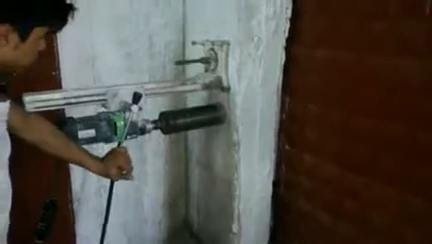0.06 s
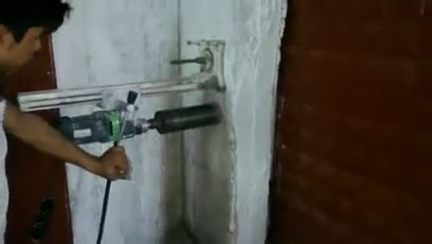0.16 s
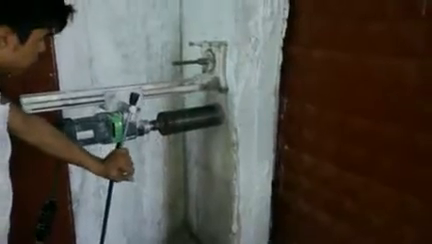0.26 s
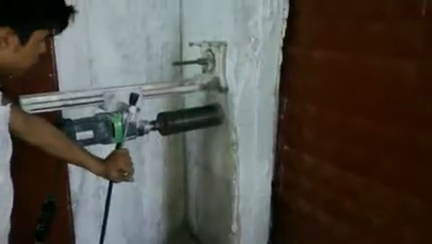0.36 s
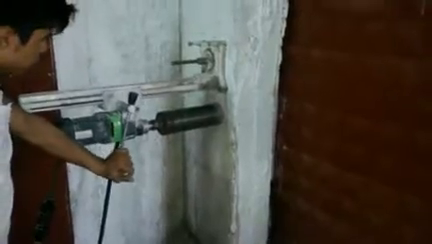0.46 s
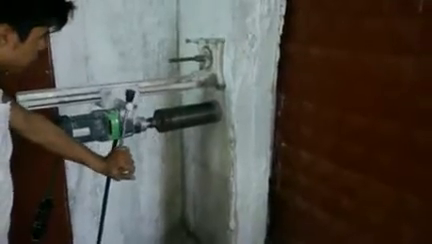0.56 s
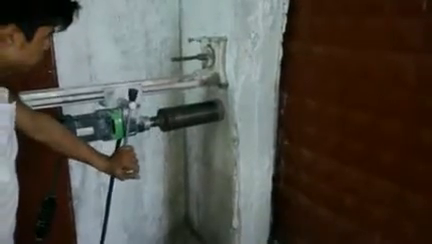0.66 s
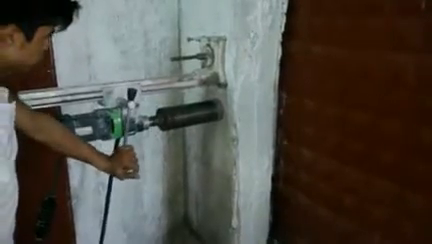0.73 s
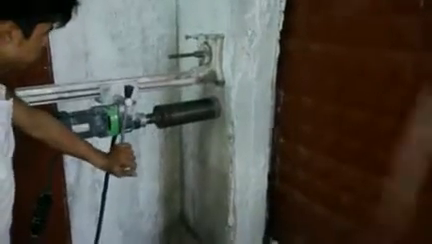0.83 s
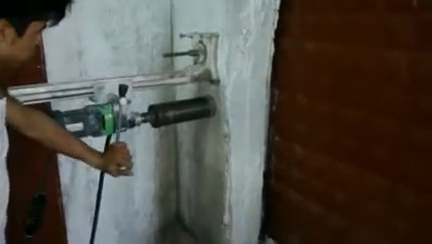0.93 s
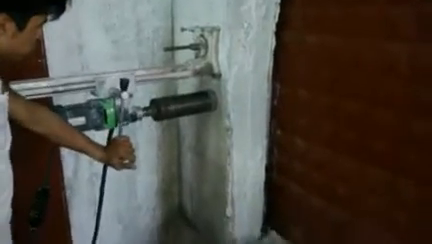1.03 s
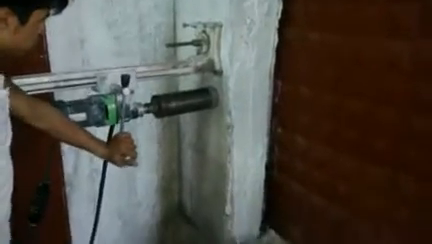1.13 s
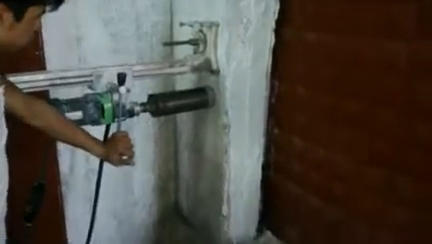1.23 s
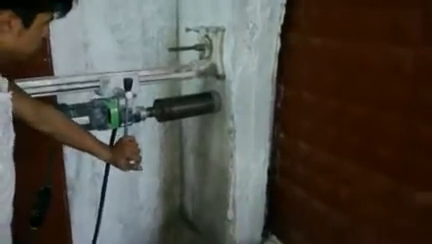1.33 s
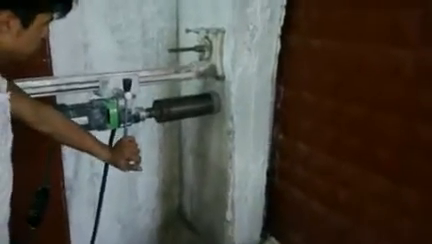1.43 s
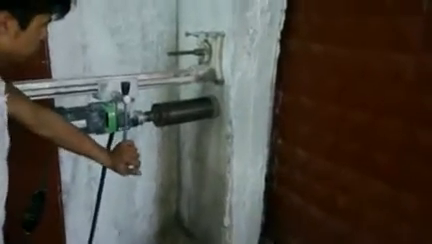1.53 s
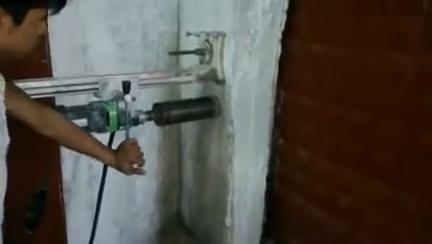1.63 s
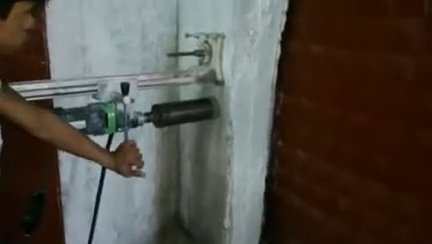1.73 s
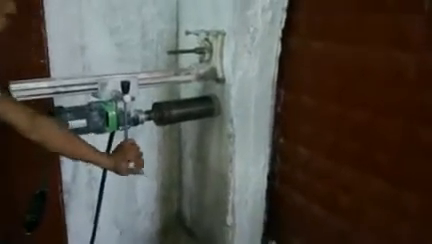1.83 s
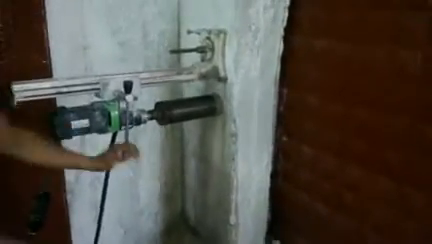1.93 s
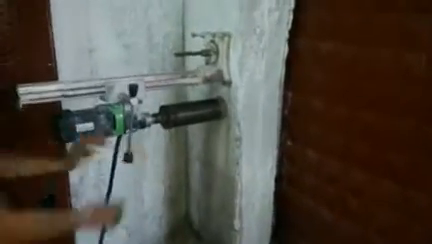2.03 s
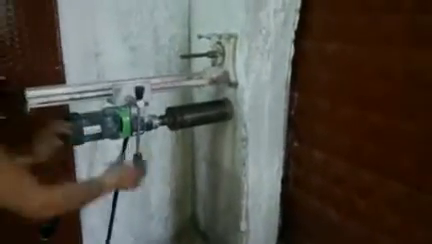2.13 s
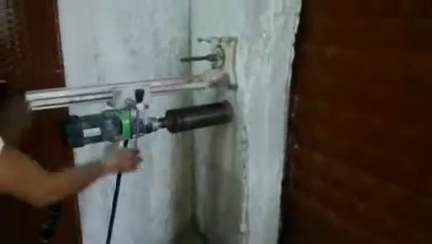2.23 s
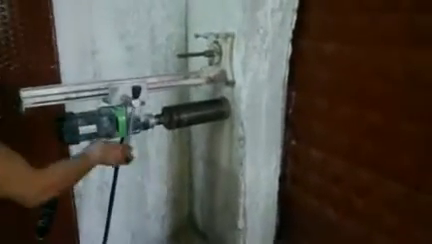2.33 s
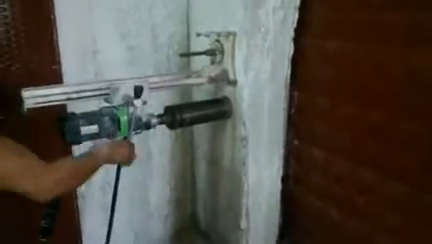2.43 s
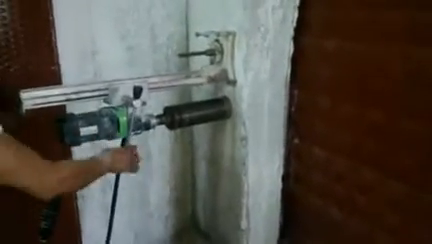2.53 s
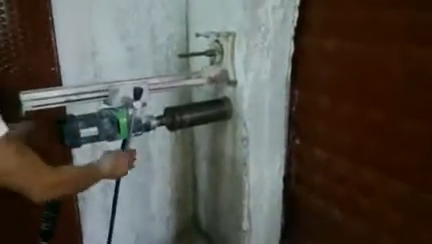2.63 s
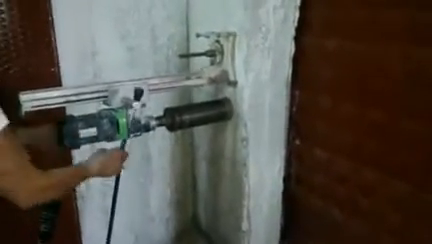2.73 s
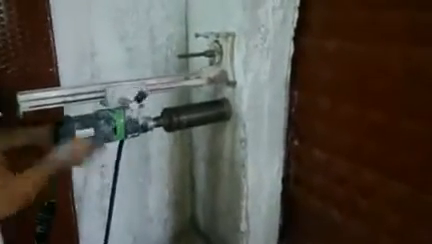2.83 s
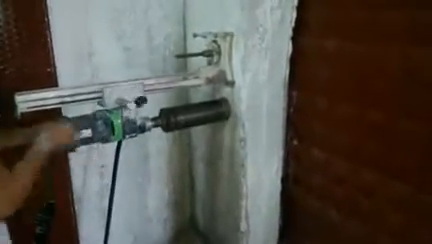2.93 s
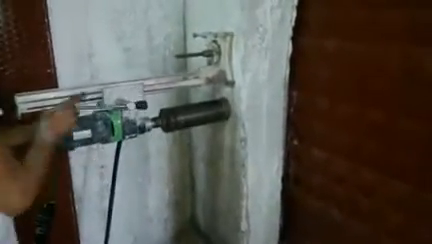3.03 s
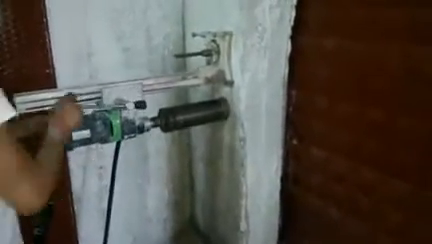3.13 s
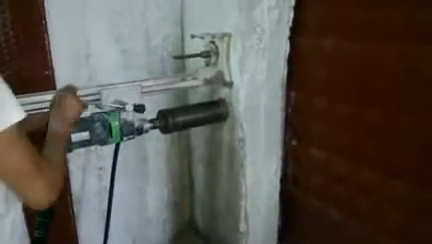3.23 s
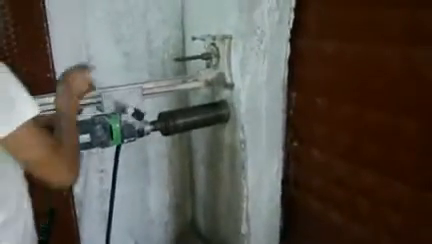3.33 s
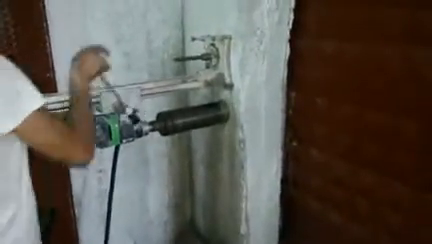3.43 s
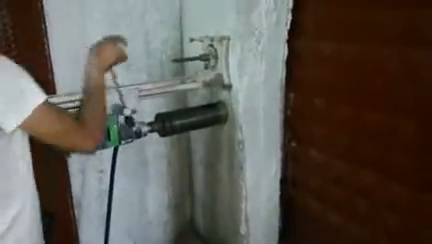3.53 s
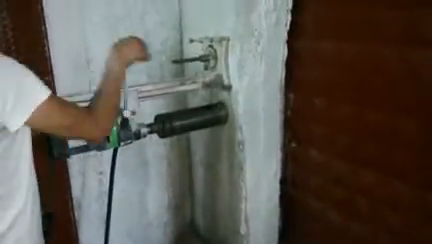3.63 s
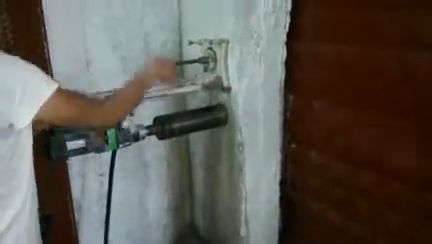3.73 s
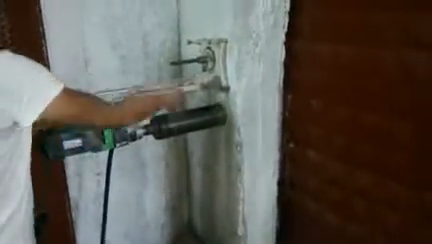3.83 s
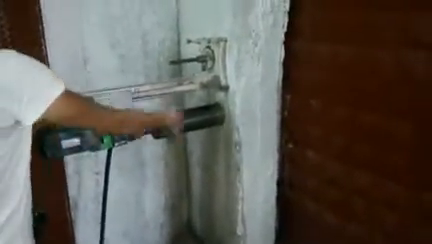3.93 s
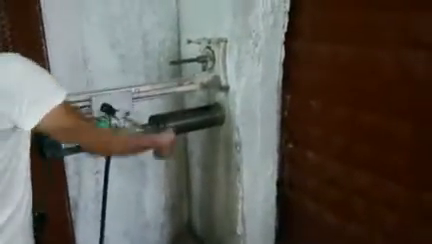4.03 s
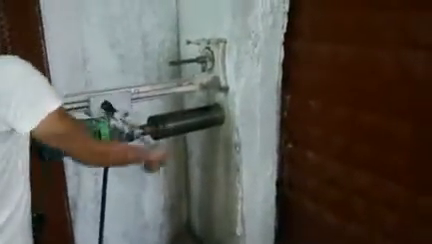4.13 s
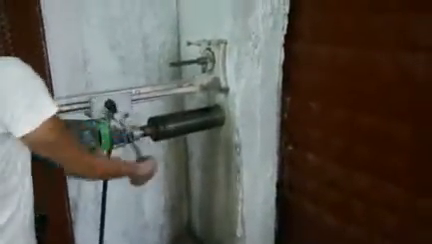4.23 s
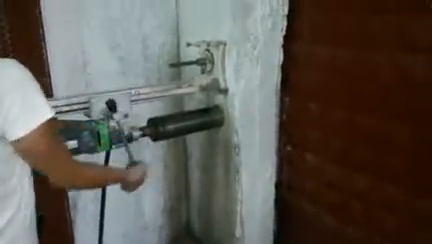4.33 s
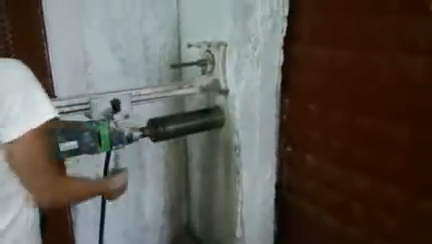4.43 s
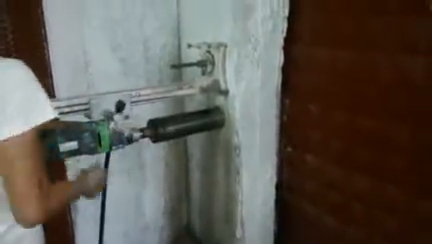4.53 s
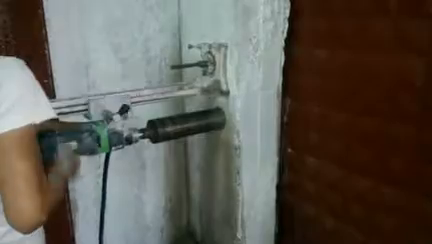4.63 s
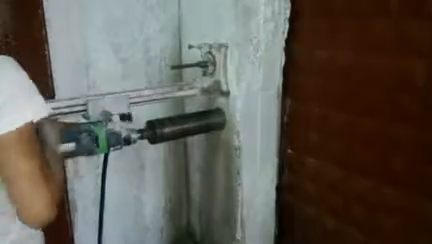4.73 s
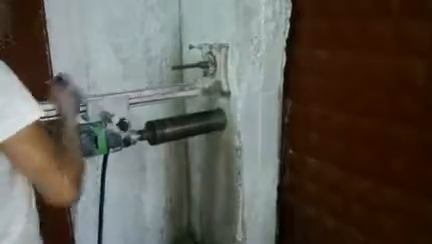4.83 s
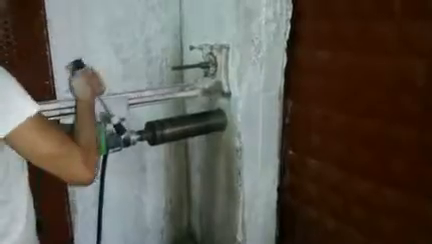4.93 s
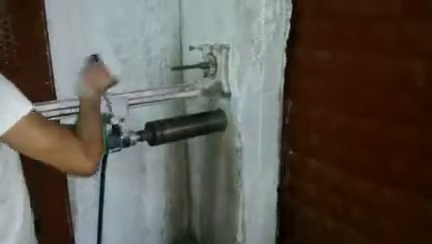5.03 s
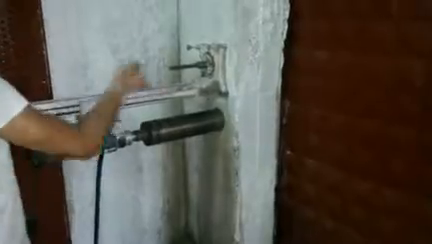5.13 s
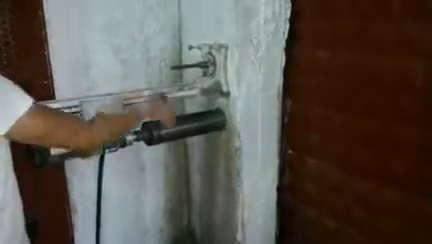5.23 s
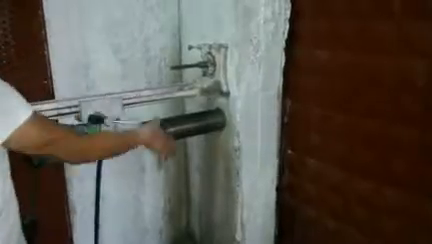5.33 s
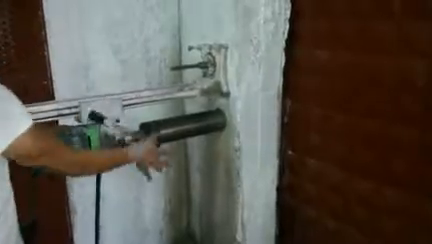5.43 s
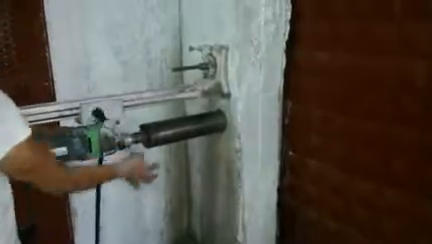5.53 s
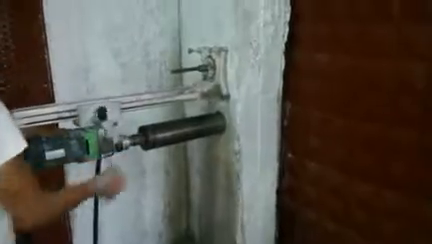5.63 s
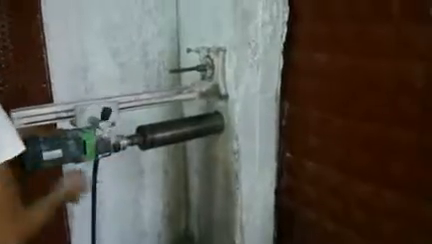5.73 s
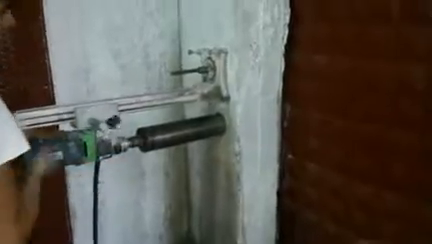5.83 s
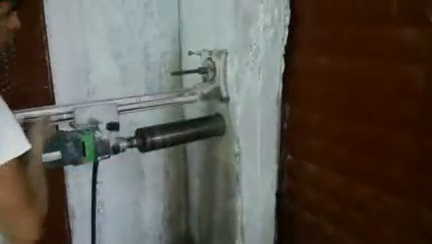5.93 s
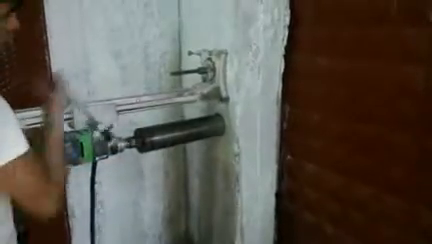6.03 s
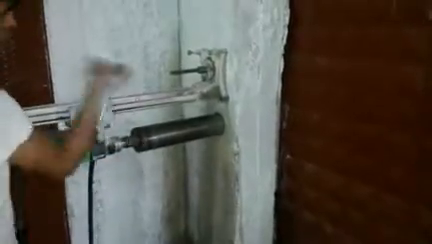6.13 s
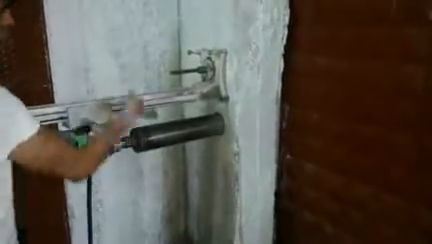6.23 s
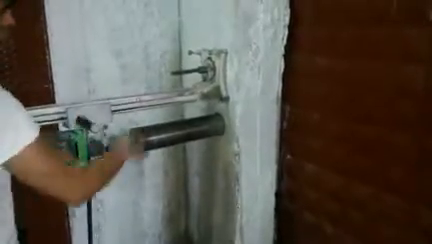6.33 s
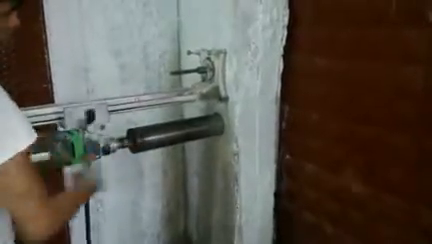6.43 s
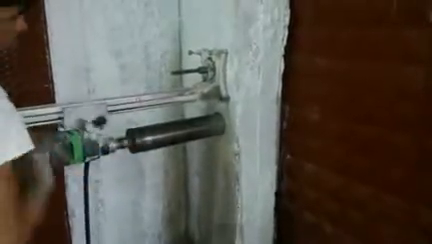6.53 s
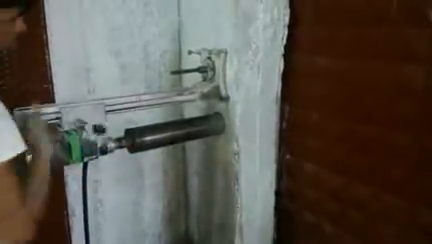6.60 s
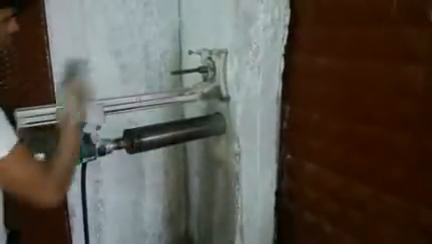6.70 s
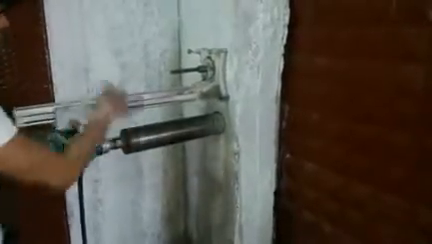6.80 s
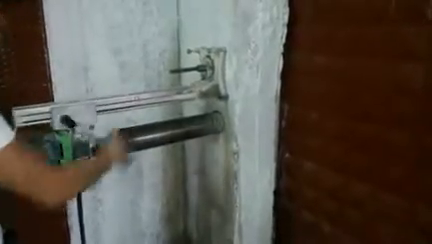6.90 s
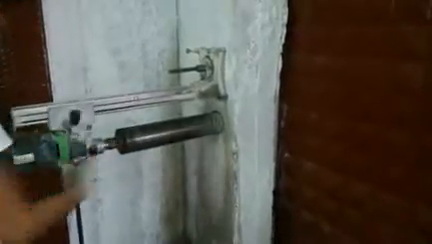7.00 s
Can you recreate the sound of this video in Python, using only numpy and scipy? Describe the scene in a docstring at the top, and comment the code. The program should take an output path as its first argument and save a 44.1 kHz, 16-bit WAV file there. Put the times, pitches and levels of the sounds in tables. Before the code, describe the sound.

A core drill grinds in concrete with a harsh bright hiss and motor roar, whistles briefly, revs up, then winds back with scrapes and squeaks.

```python
"""Core drill in a concrete wall

A core drill on a stand grinds in concrete, then is wound back out. Shaped noise makes motor roar, gears and
diamond-grit hiss; sines on pitch curves make shaft hum, fan whine and barrel whistle. The steel barrel also
squeaks and rings in its modes, over scrapes, low thuds, bumps and a drone of the stand.
Two microphone ports each add a treble resonance; the sound fades in and out."""
import sys
import numpy as np
from scipy import signal
from scipy.fft import rfft, irfft, next_fast_len
from scipy.io import wavfile
from scipy.ndimage import uniform_filter1d, map_coordinates

SR = 44100
rng = np.random.default_rng(int(sys.argv[2]) if len(sys.argv) > 2 else 0)


def invert_db(level):
    """Linear amplitude ratio for a level in decibels (20 dB per decade), elementwise."""
    return 10 ** (np.asarray(level, dtype=float) / 20)


def digitize_waveform(pressure):
    """Quantize a signal to 16-bit integers and store it at the path in sys.argv[1].

    Rows of a 2-D input are taken as channels; values are limited to [-1, 1].
    """
    field = np.atleast_2d(pressure).T
    bounded = np.clip(field, -1, 1)
    quanta = np.round(bounded * 32767).astype(np.int16)
    wavfile.write(sys.argv[1], SR, quanta)


N = 311341

# load of the work: (time [s], motor roar level [dB], grit hiss level [dB])
WORK_LEVELS = [(.1, -30, -24.5), (.45, -28.5, -23), (.6, -29, -25.5), (1.64, -29, -26), (2.1, -28.5, -26),
               (2.33, -29, -25), (2.9, -27, -26), (3.4, -26, -23.5), (4.35, -26, -23.5),
               (4.6, -26.5, -26.5), (5.1, -29.5, -26), (5.4, -26.5, -27), (5.7, -28, -25.5),
               (6.1, -30.5, -28), (6.4, -33, -28), (6.7, -37, -28.5), (7.06, -33.5, -30)]
# motor shaft: (time [s], speed [turns/s])
SHAFT_SPEED = [(.15, 318), (.55, 312), (.8, 270), (1.3, 257), (1.7, 268), (2.33, 258), (2.5, 295),
               (2.92, 354), (3.16, 375), (3.45, 383.5), (3.75, 387.5), (4.4, 391), (4.66, 320), (5.1, 270),
               (5.37, 322), (5.75, 315), (5.95, 275), (6.17, 238), (6.4, 212)]
# diamond grit on concrete: (frequency [Hz], relative level [dB])
GRIT_SPECTRUM = [(3000, -90), (5400, -56), (6400, -0.5), (8000, 1.5), (10000, -3), (12000, -3.5),
                 (14000, -10), (16000, -12)]


def unit(x):
    """Scaled to rms 1."""
    return x / np.sqrt(np.mean(x ** 2, axis=-1, keepdims=True) + 1e-20)


def along(points, hz):
    """(Hz, value) points interpolated on a log frequency axis."""
    f, v = np.transpose(points)
    return np.interp(np.log(hz + 1), np.log(f + 1), v)


def curves(rows):
    """One value per sample for each column after the time."""
    s, *cols = np.transpose(rows)
    return [np.interp(np.arange(N) / SR, s, c) for c in cols]


def wobble(rate):
    """A smooth random curve, rate knots a second."""
    knots = rng.standard_normal(int(N * rate / SR) + 4)
    return map_coordinates(knots, [np.arange(N) * rate / SR])


def filtered(x, response):
    """x times a complex response of frequency."""
    m = next_fast_len(N + 8192)
    return irfft(rfft(x, m) * response(np.fft.rfftfreq(m, 1 / SR)), m)[..., :N]


def spell(s, length, edge_s=0.059):
    """1 for a while, with soft ends."""
    t = np.arange(N) / SR
    return uniform_filter1d(1. * (t > s) * (t < s + length), max(round(edge_s * SR), 1))


def boost(hz, mode_hz, width_hz, db):
    """One resonance standing on a flat response."""
    return 1 + invert_db(db) * 1j * hz * width_hz / (mode_hz ** 2 - hz * hz + 1j * hz * width_hz)


def rush(spectrum, patchy_db, grain_db):
    """Two-port noise of rms 1: grains of uneven size, patches of random gain, partly alike left and right."""
    # (frequency [Hz], left-right correlation [-1..1])
    likeness = [(60, .4), (180, 0.43), (530, 0.72), (1500, 0.6), (3000, 0.13), (8000, 0.033),
                (14000, 0.082)]
    grains = rng.standard_normal((2, N)) * invert_db(grain_db * wobble(900))
    z = signal.stft(grains, nperseg=512)[2]
    field = uniform_filter1d(rng.standard_normal(z.shape[1:]), 6, 0)
    field = uniform_filter1d(field, 10, 1)
    patches = invert_db(patchy_db * field / field.std())
    pair = signal.istft(z * patches, nperseg=512)[1][:, :N]

    def mid_side(hz):
        angle = np.arccos(np.clip(along(likeness, hz), -1, 1)) / 2
        return invert_db(along(spectrum, hz)) * [np.cos(angle), np.sin(angle)]

    mid, side = filtered(pair, mid_side)
    return unit(np.array([mid + side, mid - side]))


def tone(hz, db, waver_db, blur_rad):
    """A sine on a pitch curve; phase wanders alike at both ports, size differently at each."""
    phase = 2 * np.pi * np.cumsum(hz) / SR + blur_rad * wobble(40)
    waver = np.array([wobble(38), wobble(14)])
    return np.sqrt(2) * invert_db(db + waver_db * waver) * np.sin(phase)


def sung(s, length, hz, db, waver_db, blur_rad):
    """A tone that lasts a while."""
    return spell(s, length) * tone(np.full(N, 1.) * hz, db, waver_db, blur_rad)


def throb():
    """Gain in dB pulsing about once per crown turn, deeper when load slows the shaft."""
    shaft_turns_per_crown_turn, depth_db = 17, 5
    free_hz, loaded_hz = 370, 290
    turns, = curves(SHAFT_SPEED)
    load = np.clip((free_hz - turns) / (free_hz - loaded_hz), 0, 1)
    crown_phase = 2 * np.pi * np.cumsum(turns / shaft_turns_per_crown_turn) / SR
    return depth_db * load * np.sin(crown_phase + 2 * wobble(6))


def grinding():
    """Roar, gears, case, grit hiss and rasp as shaped noise; the crown's uneven bite shakes them together."""
    # motor roar: (frequency [Hz], relative level [dB])
    roar_spectrum = [(300, -94), (500, -16.5), (620, -1.5), (1000, -1.5), (1350, -1.5), (1800, -11),
                     (3000, -92)]
    # small resonances in the roar: (frequency [Hz], width [Hz], level over the flat response [dB])
    housing_modes = [(691, 36, -14.5), (802, 85, -6.5), (990, 30, -2)]
    # gear noise: (frequency [Hz], relative level [dB])
    gear_spectrum = [(700, -88), (1200, -11.5), (1550, -1), (2000, -6), (2500, -2.5), (2800, -2),
                     (3700, -4), (4700, -8.5), (5500, -12.5), (8000, -90)]
    # gear case resonance: (frequency [Hz], relative level [dB])
    case_spectrum = [(900, -90), (1700, -18), (1900, -3), (2000, -1.5), (2200, -4), (2500, -11.5),
                     (4000, -90)]
    # rasp below the hiss: (frequency [Hz], relative level [dB])
    rasp_spectrum = [(2500, -90), (4300, -5), (5000, -5), (5600, -0.5), (6200, 2), (7000, -33),
                     (10000, -90)]
    # the rasp gains as the barrel is eased out: (time [s], level over the hiss [dB])
    rasp_over_grit = [(0, -11.5), (1.7, -9.5), (2.2, -5.5), (5, -4), (6.5, -1.5)]
    # drifting left-right balance: (time [s], machine [dB], grit hiss [dB])
    balance = [(.1, -0.5, 2), (.4, -2, -1), (1.2, -2, 0), (1.75, -1, -3.5), (1.95, .5, 1), (3.5, 1.5, 0),
               (5.4, 1, 0.5), (6.8, 0, 1.5)]
    gear_mean_db, gear_db_per_roar_db, gear_db_per_grit_db = -24, 0.45, 0.51
    case_mean_db, case_db_per_roar_db, case_db_per_hz = -27.5, 0.91, 0.0059
    judder_from_s, judder_full_s, judder_db = 4, 5.54, 0.5

    roar_db, grit_db = curves(WORK_LEVELS)
    turns, = curves(SHAFT_SPEED)
    louder = roar_db - roar_db.mean()
    gear_db = gear_mean_db + gear_db_per_roar_db * louder + gear_db_per_grit_db * (grit_db - grit_db.mean())
    case_db = case_mean_db + case_db_per_roar_db * louder + case_db_per_hz * (turns - turns.mean())
    rasp_db = grit_db + curves(rasp_over_grit)[0]

    # winding back, the barrel drags unevenly
    dragging = judder_db * np.interp(np.arange(N) / SR, [judder_from_s, judder_full_s], [0, 1])
    bite = 0.78 * wobble(7.5) + 0.24 * wobble(22) + .5 * wobble(45) + dragging * wobble(14)

    housing = lambda hz: np.prod([boost(hz, *mode) for mode in housing_modes], axis=0)
    roar = unit(filtered(rush(roar_spectrum, patchy_db=0.72, grain_db=0.5), housing))
    roar = invert_db(roar_db + 0.71 * bite + 1.2 * dragging * wobble(12)) * roar
    gears = invert_db(gear_db + 0.58 * bite) * rush(gear_spectrum, patchy_db=0.5, grain_db=1.0)
    case = invert_db(case_db + 1.8 * bite) * rush(case_spectrum, patchy_db=-0.3, grain_db=2.5)
    grit = invert_db(grit_db + 1.05 * bite) * rush(GRIT_SPECTRUM, patchy_db=1.0, grain_db=1.0)
    rasp = invert_db(rasp_db + 1.25 * bite) * rush(rasp_spectrum, patchy_db=2.0, grain_db=1.5)
    machine_pan, grit_pan = (invert_db(np.outer([.5, -.5], db)) for db in curves(balance))
    return (roar + gears + case + rasp) * machine_pan + grit * grit_pan


def motor():
    """Sines at the shaft rate and the fan-blade rate, and a second, weaker hum."""
    # the shaft hum stands out in spells: (time [s], length [s], level [dB])
    shaft_spells = [(.12, .55, -48), (.75, .75, -54), (1.5, .85, -49), (2.4, .82, -43), (3.32, 1.15, -40.5),
                    (4.47, .25, -45), (5.0, .2, -51), (5.32, .55, -48), (6.05, .28, -46)]
    # second hum: (time [s], length [s], start [Hz], end [Hz], level [dB])
    second_hum = [(.15, .4, 390, 386, -52), (1.2, 1, 358, 372, -51), (5.85, 1.1, 284, 305, -50)]
    blades, fan_db, fan_db_per_hz = 12, -39.5, .2  # fan_db holds at 370 turns/s
    t = np.arange(N) / SR
    turns, = curves(SHAFT_SPEED)

    shaft_gain = sum(invert_db(db) * spell(s, length, .08) for s, length, db in shaft_spells)
    shaft = shaft_gain * tone(turns, throb(), waver_db=2.5, blur_rad=.35)
    hums = 0
    for s, length, low, high, db in second_hum:
        glide = np.interp(t, [s, s + length], [low, high])
        hums = hums + sung(s, length, glide, db, waver_db=4, blur_rad=.7)
    fan_level_db = fan_db + fan_db_per_hz * (turns - 370)
    fan = sung(2.7, 1.2, blades * turns, fan_level_db, waver_db=1.5, blur_rad=.3)
    return shaft + hums + invert_db([[-8], [5]]) * fan  # fan stronger on the right


def barrel():
    """The steel tube sings while it binds in the hole; loose, it rings in its modes as the wall rubs it."""
    # whistle: (time [s], frequency [Hz], level [dB])
    whistle_rows = [(.9, 1625, -40), (1.08, 1605, -33), (1.16, 1565, -24), (1.3, 1540, -25),
                    (1.53, 1560, -25), (1.58, 1570, -33), (1.8, 1598, -30), (2.05, 1616, -28),
                    (2.12, 1605, -25), (2.17, 1570, -29), (2.27, 1570, -30), (2.33, 1570, -44)]
    # free tube modes: (frequency [Hz], damping width [Hz], relative level [dB])
    tube_modes = [(880, 40, -8), (1465, 30, -5), (2125, 80, 0), (3780, 60, -11)]
    # rubs: (centre time [s], swell length [s], level [dB])
    rubs = [(6.23, .06, -33), (6.72, .06, -35), (6.98, .12, -24)]
    t = np.arange(N) / SR

    def modes(f):
        return sum(invert_db(db) * (1j * f * w / (c * c - f * f + 1j * f * w)) ** 2 for c, w, db in tube_modes)

    rubbing = sum(invert_db(db) * np.exp(-(2 * (t - s) / length) ** 2) for s, length, db in rubs)
    ring = rubbing * unit(filtered(rng.standard_normal((2, N)), modes))

    hz, db = curves(whistle_rows)
    start = whistle_rows[0][0]
    length = whistle_rows[-1][0] - start
    octave = sung(start, length, 2 * hz, db - 16, waver_db=3.5, blur_rad=2.5)
    whistle = invert_db(2 * wobble(35)) * sung(start, length, hz, db, waver_db=.8, blur_rad=.7)
    return octave + whistle + ring


def squeaks():
    """Rough bursts: a high mode of the tube inside narrow noise."""
    # (centre time [s], swell length [s], frequency [Hz], sine peak level [dB])
    squeak_rows = [(5.26, .08, 5840, -31), (5.66, .07, 5840, -32), (6.15, .3, 5560, -29),
                   (6.28, .11, 5690, -25), (6.5, .065, 5560, -25), (6.72, .055, 5550, -25),
                   (6.94, .1, 6020, -30)]
    t = np.arange(N) / SR
    rough = unit(np.array([[wobble(140), wobble(140)], [wobble(140), wobble(140)]]))
    out = np.zeros((2, N))
    for s, length, hz, db in squeak_rows:
        swell = invert_db(db) * np.exp(-(2 * (t - s) / length) ** 2 + .12 * wobble(45))
        phase = 2 * np.pi * hz * t
        out += swell * ((1 + .6 * rough[:, 0]) * np.sin(phase) + .6 * rough[:, 1] * np.cos(phase))
    return invert_db([[-2], [2]]) * out


def scrapes():
    """The barrel scrapes the rim: bursts of grit noise, fast rise, decay over some milliseconds."""
    # (onset time [s], peak level [dB])
    scrape_rows = [(0.6679, -26), (4.239, -23), (5.199, -20.5), (5.3194, -23), (5.477, -24.5),
                   (5.9594, -23), (6.2194, -23), (6.3794, -23.5), (6.5465, -21.5), (6.7494, -25.5)]
    rise_s = 0.0045
    t, size = np.arange(N) / SR, np.zeros(N)
    for s, db in scrape_rows:
        u = np.clip(t - s, 0, None) / rise_s
        size += invert_db(db) * u * np.exp(1 - u)
    return size * rush(GRIT_SPECTRUM, patchy_db=1.5, grain_db=-2.5)


def knocking():
    """Spells of lumpy low-frequency noise, only partly alike at the two ports."""
    # (time [s], length [s], level [dB])
    thud_spells = [(.37, .07, -64), (.6, .24, -66), (1.64, .09, -56), (2.28, .07, -62), (2.55, .08, -54),
                   (2.72, .07, -57), (2.9, 1.6, -58), (4.6, .24, -59), (4.97, .17, -57), (5.3, 1.4, -58),
                   (6.72, .12, -50), (6.9, .2, -59)]
    # (frequency [Hz], relative level [dB])
    knock_spectrum = [(15, -9), (40, -0.5), (120, 1.5), (200, 0), (400, -60)]
    floor_db = -82
    thuds = invert_db(floor_db) + sum(invert_db(db) * spell(s, length, 0.023) for s, length, db in thud_spells)
    lumps = invert_db(1.5 * wobble(5.5) + 1.6 * wobble(14) + 1.6 * np.array([wobble(6.3), wobble(16)]))
    source = rng.standard_normal((2, N)) + 1.9 * rng.standard_normal(N)  # own + common
    low = filtered(source, lambda hz: invert_db(along(knock_spectrum, hz)))
    return thuds * unit(lumps * low)


def bumps():
    """Soft bumps on the stand: short, dull swells of a low mode."""
    # (centre time [s], frequency [Hz], peak level [dB])
    bump_rows = [(.27, 175, -53), (1.22, 195, -49), (1.68, 180, -105), (1.87, 190, -48), (2.13, 210, -38.5),
                 (2.349, 165, -42), (2.58, 170, -54), (4.65, 165, -48), (6.88, 160, -40)]
    t = np.arange(N) / SR
    return sum(invert_db(db) * np.exp(-((t - s) / 0.019) ** 2) * np.sin(2 * np.pi * hz * t) for s, hz, db in bump_rows)


def drone():
    """Patchy drone of the stand: low noise that follows the roar and the throb slightly."""
    # (frequency [Hz], relative level [dB])
    drone_spectrum = [(90, -71), (160, -21), (210, -9), (250, -0.5), (330, 2.5), (430, -2), (500, 4),
                      (570, -7), (750, -35), (1500, -90)]
    mean_db, db_per_roar_db = -41, 0.22
    roar_db = curves(WORK_LEVELS)[0]
    level_db = mean_db + db_per_roar_db * (roar_db - roar_db.mean()) + 1.0 * wobble(8) + 0.27 * throb()
    return invert_db(level_db) * rush(drone_spectrum, patchy_db=2.8, grain_db=0)


def scene():
    """All sources under a short fade in and out."""
    start_s, first_gain, fade_in_s = .105, .09, .09  # opens a little way up; fade_in_s per unit gain
    fade_out_from_s, fade_out_s = 6.985, .11
    t = np.arange(N) / SR
    fade_in = (t > start_s) * np.clip(first_gain + (t - start_s) / fade_in_s, 0, 1)
    fade_out = np.clip(1 - (t - fade_out_from_s) / fade_out_s, 0, 1)
    tool = grinding() + motor() + barrel() + squeaks() + scrapes()
    stand = knocking() + bumps() + drone()
    return fade_in * fade_out * (tool + stand)


def ports(hz):
    """Response of the two ports: resonance, left-right tilt; the left hears the drill later."""
    # left, right port: (frequency [Hz], width [Hz], level over the flat response [dB])
    port_modes = [(6800, 860, 14), (8310, 1690, 13.5)]
    # (frequency [Hz], left over right [dB])
    tilt = [(60, -3), (250, -4.5), (800, -4.5), (1700, 0), (2600, 1), (4500, -5.5), (14000, -1)]
    left_lag_s = 1.2e-4
    side = np.array([[.5], [-.5]])
    peak = np.array([boost(hz, *mode) for mode in port_modes])
    return peak * invert_db(side * along(tilt, hz)) * np.exp(-2j * np.pi * hz * side * left_lag_s)


def band_limit(x):
    """A steep low-pass at the top of the band."""
    return signal.sosfilt(signal.butter(12, 14430, fs=SR, output="sos"), x)


def record(dry):
    """Microphone ports, then clipping at full scale."""
    heard = np.clip(filtered(dry, ports), -1, 1)
    return band_limit(heard)


dry = scene()
out = record(dry)
digitize_waveform(out)
```